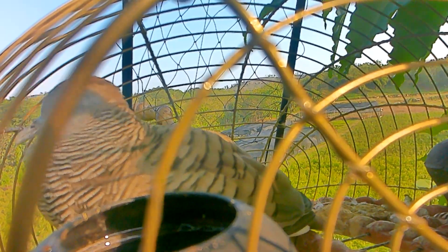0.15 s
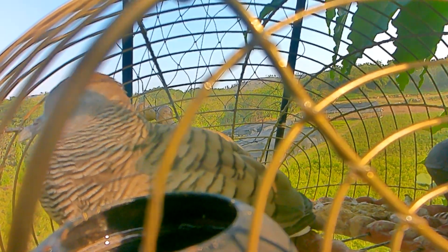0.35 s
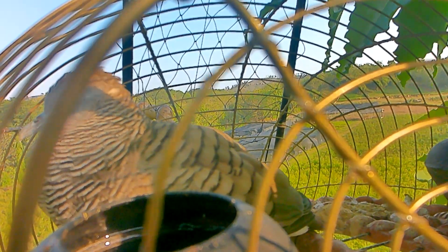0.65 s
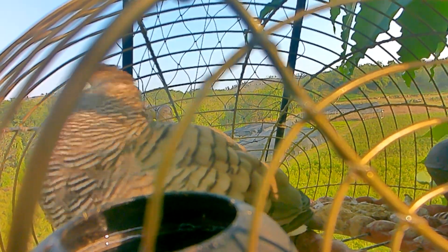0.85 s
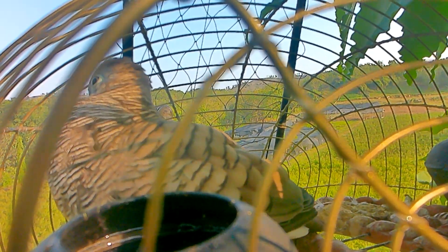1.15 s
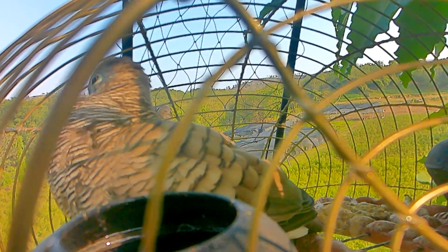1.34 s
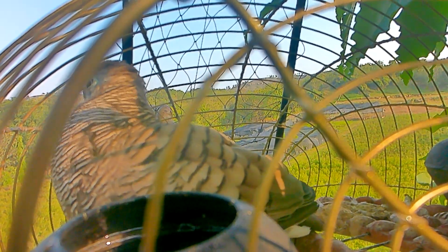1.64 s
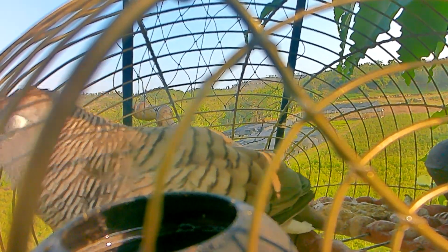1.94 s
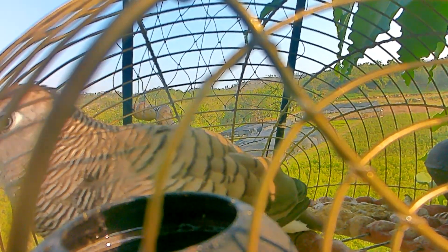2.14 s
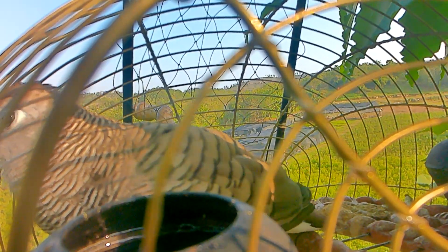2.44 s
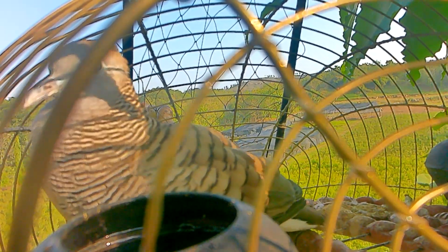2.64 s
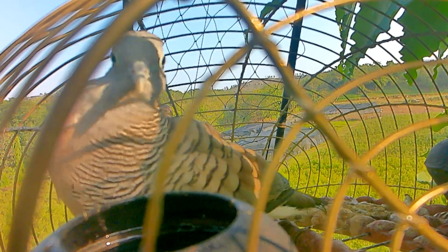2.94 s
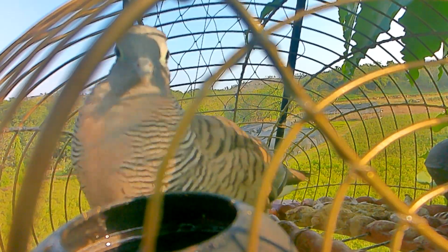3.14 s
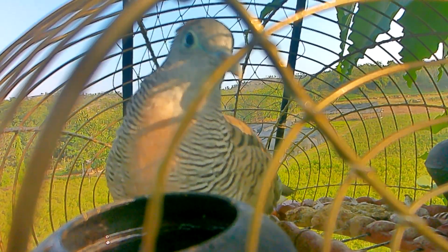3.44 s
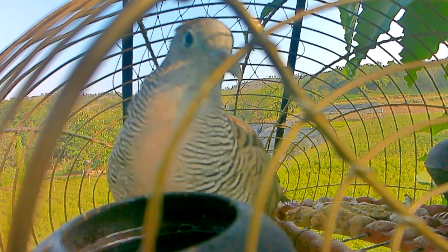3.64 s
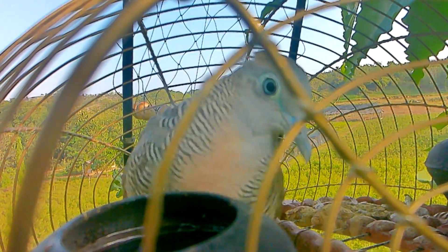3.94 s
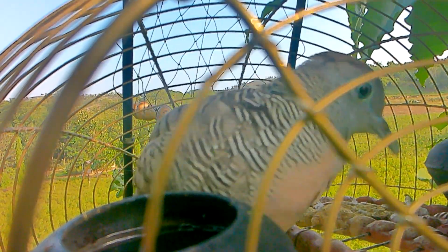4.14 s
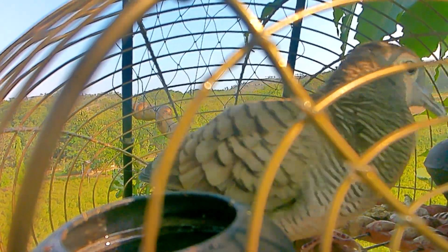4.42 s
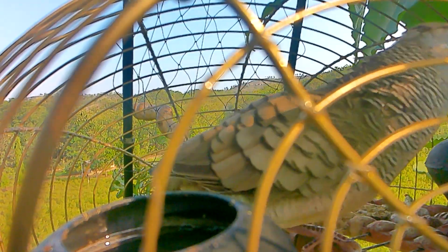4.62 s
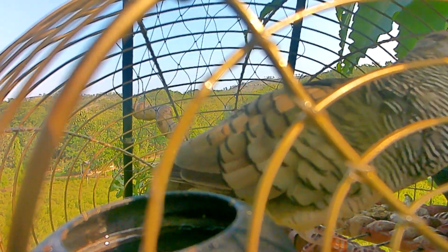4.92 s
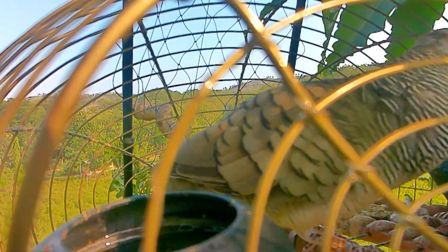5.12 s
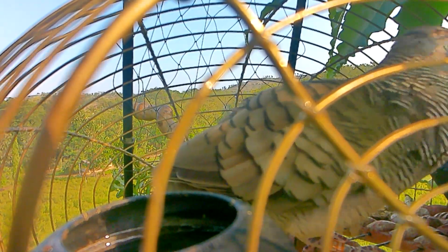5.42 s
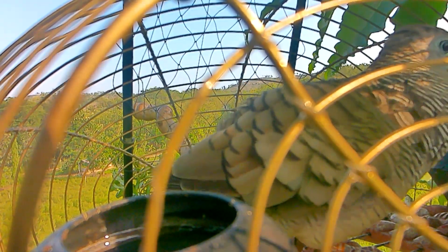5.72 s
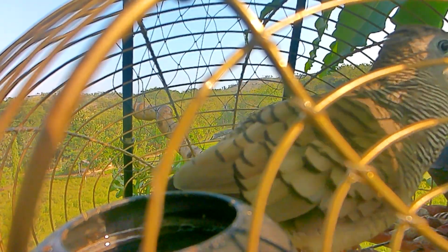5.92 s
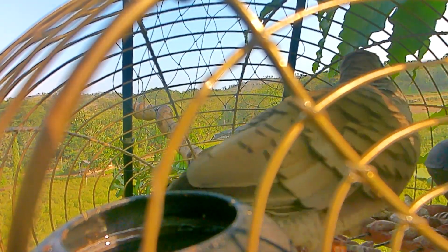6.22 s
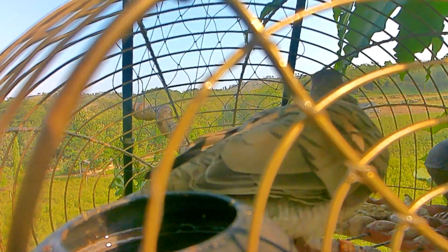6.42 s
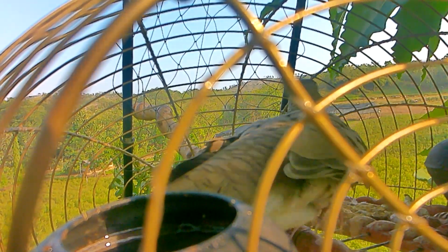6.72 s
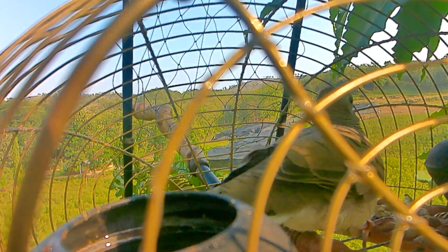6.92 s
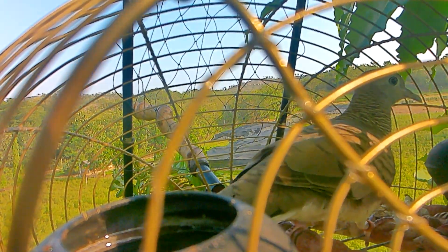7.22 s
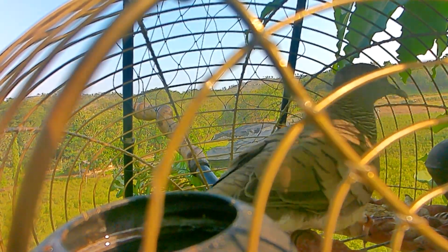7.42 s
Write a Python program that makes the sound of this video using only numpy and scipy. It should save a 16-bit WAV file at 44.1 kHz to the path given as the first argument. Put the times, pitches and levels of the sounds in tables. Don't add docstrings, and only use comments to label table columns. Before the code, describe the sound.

Outdoors in an open field, very close to a small microphone, wind rumbles and buffets softly over a faint distant engine hum. A caged dove gives a rolling four-note coo at two seconds, then shifts its feet with dry knocks on cane. A heavy wind thump hits, more claw rattles follow, then a softer coo near five seconds. A far bird repeats tiny falling whistles as the feet scrabble again.

```python
import sys
import numpy as np
from scipy import signal
from scipy.io import wavfile
from scipy.ndimage import uniform_filter1d

SR = 44100
rng = np.random.default_rng(int(sys.argv[2]) if len(sys.argv) > 2 else 0)


def persist_wave(psi):
    counts = np.round(np.clip(psi, -1, 1) * 32767).astype(np.int16)
    wavfile.write(sys.argv[1], SR, np.atleast_2d(counts).T)


def ratio_of_db(decibels):
    return 10 ** (np.asarray(decibels, float) / 20)


N = 333387


def evened(x):
    return x / np.sqrt(np.mean(x ** 2) + 1e-20)


def smoothed(x, size):
    return signal.oaconvolve(x, np.hanning(size) / np.hanning(size).sum(), "same")


def drifting(count, size):
    return evened(smoothed(rng.standard_normal(count), size=size))


def along(table, x):
    return np.interp(x, *np.transpose(table))


def add(mix, s, sound):
    part = mix[round(s * SR):][:len(sound)]
    part += sound[:len(part)]


def resonate(x, hz, width):
    pole = np.exp((2j * np.pi * hz - np.pi * width) / SR)
    return 2 * signal.lfilter([1 - abs(pole)], [1, -pole], x).real


def noise_band(hz, width):
    return evened(resonate(rng.standard_normal(N), hz, width))


def coloured(points, patchy_db, size):
    hop, hz = size // 4, np.fft.rfftfreq(size, 1 / SR)
    a, b, patches = rng.standard_normal((N // hop + 5, len(hz), 3)).T
    patches = uniform_filter1d(patches, size=10, axis=0)
    patches = evened(uniform_filter1d(patches, size=8, axis=1))
    f, db = np.transpose(points)
    shape_db = np.interp(np.log(hz + 1), np.log(f + 1), db, left=-120, right=-120)
    spectrum = (a + 1j * b) * ratio_of_db(shape_db[:, None] + patchy_db * patches)
    return evened(signal.istft(spectrum, nperseg=size, noverlap=size - hop)[1][:N])


def echoes(x, t60, first_s):
    t = np.arange(SR // 2) / SR
    present = rng.standard_normal(len(t)) * (rng.random(len(t)) < .05)
    taps = present * ratio_of_db(-60 * t / t60) * (t > first_s)
    return signal.fftconvolve(x, taps / np.linalg.norm(taps))[:N]


# (frequency [Hz], density [dB per Hz])
AIR_WASH = [(71, -26.5), (120, 0.5), (270, -12), (308, -7.5), (428, -7.5), (465, -4.5), (493, -11.5),
            (541, -14.5), (616, -15.5), (685, -20.5), (744, -26), (2000, -37.5), (2600, -72), (4400, -120)]
# (frequency [Hz], density [dB per Hz])
MIC_HISS = [(1180, -35.5), (2000, -2.5), (2820, -3), (3050, -3), (3940, -5), (4760, -5), (5190, -7.5),
            (14700, -9.5), (15600, -5.5)]
# (frequency [Hz], width [Hz], level [dB])
ENGINE_LINES = [(299, 5, -63.5), (330.8, 7.4, -66), (462, 3.1, -58), (713, 17, -74)]


def field():
    wash = ratio_of_db(-47.5) * coloured(AIR_WASH, patchy_db=1.5, size=1024)
    hiss = ratio_of_db(-69) * coloured(MIC_HISS, patchy_db=1.1, size=512)
    engine = sum(ratio_of_db(db) * noise_band(hz, width) for hz, width, db in ENGINE_LINES)
    return wash + hiss + engine


# (frequency [Hz], density [dB per Hz])
LOW_PRESSURE = [(5.9, -30), (10, 0.5), (17, 3.5), (20, 0.5), (22, -8), (76, -6), (108, -12), (130, -32),
                (170, -53), (290, -120)]
# (time of the peak [s], level [dB], half length [s])
GUSTS = [(.05, -29, 0.02), (0.178, -30.5, 0.12), (0.445, -34.5, 0.19), (0.933, -31, .04),
         (1.104, -34, 0.26), (1.36, -36, .04), (1.555, -44, 0.037), (1.85, -34.5, 0.053),
         (2.06, -36.5, 0.052), (2.19, -31.5, 0.055), (2.634, -30.5, 0.042), (3.352, -43, 0.037),
         (3.65, -31, 0.084), (3.868, -21.5, .05), (4.03, -30, 0.045), (4.315, -35.5, 0.13),
         (4.614, -30.5, 0.087), (4.905, -32, 0.071), (5.035, -37, 0.047), (5.666, -35, 0.059),
         (5.783, -36, 0.053), (6.099, -32.5, .07), (6.318, -31, .1), (6.75, -37, 0.14), (7.298, -34.5, .12),
         (7.5, -38, .06)]
# (time [s], frequency [Hz])
MOAN_DRIFT = [(0, 46.7), (.55, 65), (.84, 83.6), (1.3, 68), (2.06, 54.85), (2.25, 64.64), (2.74, 66.05),
              (2.9, 79), (3.4, 73.2), (3.66, 59.9), (4.2, 64), (4.9, 52.37), (5.2, 72.8), (5.5, 65.3),
              (5.8, 78.9), (6.4, 84.1), (7.0, 59.83), (7.56, 82.7)]
# (time [s], peak level [dB], frequency [Hz], length [cycles])
GUST_SLAPS = [
    (0.244, -19.5, 44.4, 1.4),
    (0.255, -21, 258, 1.6),
    (3.826, -18.5, 56.7, 0.85),
    (3.854, -12, 77.5, 0.99),
    (3.863, -12, 40.3, 1.05),
    (3.861, -26.5, 380, 2.7),
    (3.907, -19, 40, 1.7),
    (4.894, -16, 38, 1.3),
    (4.919, -23, 143, 1.67),
]


def wind():
    t = np.arange(N) / SR
    breeze_db = -42
    bright = coloured([(100, -20.5), (130, 5.5), (230, -9.5), (400, -30.0)], patchy_db=2.5, size=1024)
    turns = 2 * np.pi * np.cumsum(along(MOAN_DRIFT, t)) / SR
    moan = (0.9 + drifting(N, 4000)) * np.cos(turns) + drifting(N, 4000) * np.sin(turns)
    force = ratio_of_db(breeze_db + 0.5 * drifting(N, 5000))
    for s, db, half_s in GUSTS:
        span = slice(max(round((s - 3 * half_s) * SR), 0), round((s + 3 * half_s) * SR))
        force[span] = np.maximum(force[span], ratio_of_db(db - 9 * abs(t[span] - s) / half_s))
    low = ratio_of_db(-0.5) * coloured(LOW_PRESSURE, patchy_db=0.0, size=4096)
    out = force * (low + ratio_of_db(-4.0) * evened(moan))
    out += ratio_of_db(-53.5) * (force / ratio_of_db(breeze_db)) ** 0.65 * bright
    for s, db, hz, cycles in GUST_SLAPS:
        u = np.arange(round(cycles / hz * SR)) * hz / SR
        add(out, s, ratio_of_db(db) * np.sin(2 * np.pi * u) * np.sin(np.pi * u / cycles) ** 2)
    return out


# (time [s], peak level [dB], 1.2 kHz share [dB], 2.4 kHz share [dB])
KNOCKS = [(0.088, -41.5, -22, -41), (3.086, -32.5, -10, -19), (3.093, -26.5, -27, -32),
          (3.1, -30.5, -14.5, -26), (3.125, -32.5, -18, -36), (3.139, -31, -12.5, -41),
          (3.159, -45, -13.5, -41), (3.63, -39.5, -14, -42), (3.691, -45, -20, -32), (4.026, -41, -25, -44),
          (4.101, -38.5, -24, -36), (4.205, -54, -20, -14), (4.251, -44, -5, -22), (4.266, -34, -28, -43),
          (4.364, -42, -8.5, -28), (4.377, -42.5, -7.5, -37), (4.428, -28.5, -16, -39),
          (4.457, -42, -20, -33), (6.19, -40.5, -20, -25), (6.425, -31, -12, -34), (6.462, -38, -19, -41),
          (6.765, -48.5, -11, -14), (6.808, -46, -3.5, -35), (6.913, -51, -22, -14), (6.953, -29, -31, -34),
          (6.967, -37.5, -20, -23), (6.985, -34, -36, -30), (7.051, -44, -11, -24), (7.084, -46, -24, -17),
          (7.528, -40, -3.5, -5)]
# (start [s], length [s], level [dB])
SHUFFLES = [(0, 0.242, -64), (0.998, 0.47, -73), (3.056, 0.15, -62), (3.254, 0.49, -69.5),
            (3.81, 0.11, -64), (4.013, 0.51, -67), (4.62, .14, -66), (6.166, 0.32, -66.5),
            (6.535, 0.33, -71), (6.8, 0.31, -64.5), (7.384, 0.28, -65.5)]
# (frequency [Hz], width [Hz], level [dB])
LOW_MODES = [(500.3, 65, 0.5), (567.4, 18.5, -2.5), (656, 28, -12.5), (811, 58, -17.5)]
MID_MODES = [(888, 8, -4), (1160, 51, -3.5), (1239.5, 28, -2.5), (1398, 77, -14)]
HIGH_MODES = [(2250, 94, -2.5), (2567, 164, -7), (4200, 160, -21), (5300, 200, -20), (11000, 400, -30)]


def cage():
    drives, t = np.zeros((3, N)), np.arange(1500) / SR
    blow = np.exp(-((t - .0004) / .00015) ** 2)
    for s, db, mid_db, high_db in KNOCKS:
        grit = rng.standard_normal(len(t))
        scrape = ratio_of_db(27 - 60 * t / 0.057) * np.minimum(t / 0.0013, 1) * grit
        add(drives[0], s, ratio_of_db(db) * (ratio_of_db(24) * blow + ratio_of_db(-4) * scrape))
        add(drives[1], s, ratio_of_db(db + mid_db) * (ratio_of_db(26.5) * blow + scrape))
        add(drives[2], s, ratio_of_db(db + high_db) * (ratio_of_db(36) * blow + scrape))
    busy = np.zeros(N)
    for s, length, db in SHUFFLES:
        u = np.arange(0, length, 1 / SR)
        add(busy, s, ratio_of_db(db) * np.minimum(np.minimum(u, length - u) / 0.013, 1))
    grain_db = 1.5 * drifting(N, 900)
    rustle = rng.standard_normal(N) * busy * ratio_of_db(grain_db + 24.5)
    drives += rustle * ratio_of_db(np.array([[6.], [0.], [-11.]]))
    out = np.zeros(N)
    for drive, modes in zip(drives, (LOW_MODES, MID_MODES, HIGH_MODES)):
        for hz, width, db in modes:
            pole_width = 1.41 * width
            out += ratio_of_db(db) * resonate(resonate(drive, hz, pole_width), hz, pole_width)
    return out


# (multiple, level [dB])
HARMONICS = [(1, 0), (2, -37), (3, -49), (4, -54), (5, -57), (6, -63), (7, -55)]


def voiced(turns, second_db, upper_db):
    flicker_db = 3.0 * drifting(len(turns), 500)
    lift_db = {1: 0, 2: second_db + flicker_db}
    tone = 0
    for k, db in HARMONICS:
        tone = tone + ratio_of_db(db + lift_db.get(k, upper_db + flicker_db)) * np.sin(2 * np.pi * k * turns)
    return np.sqrt(2) * tone


# (time [s], level [dB])
BEAK_OPENING = [(2.05, -2.5), (2.2, -5.5), (2.33, 1.5), (2.46, 0), (4.86, -3.5), (4.95, -2), (4.99, 10),
                (5.04, -1), (5.13, 13), (5.25, 1.5)]


def opening(s, creak_s, pop_s, creak_db, pop_db):
    t = np.arange(0, creak_s + pop_s + 0.017, 1 / SR)
    knots = [0, creak_s, creak_s + .35 * pop_s, creak_s + pop_s]
    pop_end_hz = 986 + 2200 * pop_s
    turns = np.cumsum(np.interp(t, knots, [420, 440 - 2500 * pop_s, 465, pop_end_hz / 2])) / SR
    beat_hz = np.interp(t / creak_s, [0, 1, 1.6], [470 - 8500 * creak_s, 460, 560])
    beat = 2 * np.pi * np.cumsum(beat_hz) / SR
    pulses = np.sin(beat) + .6 * np.sin(2 * beat + 1.2) + .25 * np.sin(3 * beat + 2.4)
    rasp = np.diff(rng.standard_normal(len(t) + 1))
    pulses += .4 * evened(smoothed(smoothed(rasp, size=40), size=40))
    creak = ratio_of_db(creak_db + np.interp(t / creak_s, [0, .8, 1.15, 1.7], [-12, 0, -2, -24]))
    creak = smoothed(creak * np.minimum(t / .002, 1), size=120)
    throat = signal.butter(4, 1300, fs=SR, output="sos")
    creak = signal.sosfilt(throat, creak * pulses)
    u = (t - creak_s) / pop_s
    swell = smoothed(np.interp(u, [-.15, .2, .4, .72, .94, 1.04], [0, .4, .72, 1, .83, 0]), size=90)
    strain_db = along(BEAK_OPENING, s) + 22 * (np.clip(u, 0, 1) - .7)
    return np.sqrt(2) * creak + ratio_of_db(pop_db) * swell * voiced(2 * turns, strain_db, upper_db=-8.5)


# (time [s], creak length [s], pop length [s], creak level [dB], pop level [dB])
NOTE_OPENINGS = [
    (1.998, 0.022, 0.022, -29.5, -17),
    (2.219, 0.0062, 0.016, -34, -16.5),
    (2.303, 0.0085, 0.013, -28.5, -16),
    (2.404, 0.0075, 0.016, -27, -17.5),
    (4.809, 0.00946, 0.030, -32.5, -28.5),
    (5.018, 0.0041, 0.0172, -37, -27),
    (5.095, 0.0072, 0.018, -35.5, -26.5),
    (5.197, 0.0087, 0.016, -34, -25.5),
]
# (time [s], length [s], level [dB], top [Hz], sag after the top [Hz])
THROBS = [(2.04, 0.027, -24.5, 1274, 33), (2.067, 0.031, -24.5, 1287, 7.7), (2.100, .037, -23, 1259, 60),
          (2.136, 0.032, -23, 1231, 52), (2.172, 0.034, -23, 1193, 37), (2.24, 0.017, -24, 1160, 77),
          (2.325, .028, -25, 1172, 54), (2.429, 0.098, -23.5, 1236, 160), (4.850, 0.024, -25, 1255, 5),
          (4.874, 0.027, -24.5, 1255, 81), (4.899, 0.036, -24.5, 1233, 46), (4.937, 0.028, -25, 1216, 31.5),
          (4.975, 0.034, -31, 1184, 92), (5.038, 0.015, -36.5, 1126, 110), (5.124, 0.0144, -34, 1145, 126),
          (5.225, 0.076, -27.5, 1228, 110), (5.290, 0.022, -41, 1140, 42), (0, 0.012, -33, 1190, 150)]
# (time [s], peak level [dB])
TONGUE_CLICKS = [
    (0.045, -45.5),
    (1.969, -36),
    (4.774, -45.5),
]
# (frequency [Hz], width [Hz], level [dB])
BREATH_BANDS = [(645, 420, -28.5), (1530, 350, -35), (1940, 280, -39.5)]


def dove():
    hz, gain = np.full(N, 1100.), np.zeros(N)
    release = ratio_of_db(-60 * np.arange(1500) / SR / 0.014)
    pop_ends = np.array([0] + [row[0] + row[1] + row[2] for row in NOTE_OPENINGS])
    for s, length, db, top_hz, sag_hz in sorted(THROBS):
        late_s = s - pop_ends[pop_ends < s + .02].max()
        at, u = round(s * SR), np.linspace(0, 1, round(length * SR))
        dip_hz = 50.1 + 45000 * abs(late_s) ** 3
        rise, sag = np.sqrt(dip_hz), np.sqrt(abs(sag_hz))
        slope = u * (rise + sag) - rise
        below = slope ** 2
        fade_db = 0.065 * below * (slope > 0) + 1.5 * u + 3 * (1 - u) ** 4
        hz[at:] = top_hz - sag_hz
        hz[at:at + len(u)] = top_hz - below
        gain[at + len(u):][:len(release)] = ratio_of_db(db - fade_db[-1]) * release
        gain[at:at + len(u)] = ratio_of_db(db - fade_db)
    shimmer = 1 + .035 * drifting(N, 300)
    gain = smoothed(gain, size=170) * shimmer
    air = 0
    for f, width, db in BREATH_BANDS:
        air = air + ratio_of_db(db) * evened(resonate(resonate(rng.standard_normal(N), f, width), f, width))
    t = np.arange(N) / SR
    turns = np.cumsum(uniform_filter1d(hz, size=150)) / SR
    upper_db = -0.5 - 3.5 * (t > 4)
    out = gain * (air + voiced(turns, along(BEAK_OPENING, t), upper_db))
    for row in NOTE_OPENINGS:
        add(out, row[0], opening(*row))
    t = np.arange(600) / SR
    for s, db in TONGUE_CLICKS:
        click = ratio_of_db(db + 11 - 60 * t / 0.014) * (1 - np.exp(-(t / 0.0009) ** 2))
        add(out, s, click * np.sin(2 * np.pi * 960 * t))
    return out + ratio_of_db(-19.5) * echoes(out, t60=0.11, first_s=0.0056)


# (time [s], length [s], frequency [Hz], level [dB])
PEEPS = [(4.645, .03, 2850, -66), (4.70, .008, 5100, -66), (4.71, .007, 5250, -67),
         (4.705, .006, 5700, -69), (4.235, .022, 2550, -61), (.17, .03, 2750, -67), (.23, .02, 2700, -67),
         (6.19, .06, 590, -43), (.005, .03, 1290, -52), (4.52, .06, 390, -47), (3.32, .13, 1260, -66),
         (.06, .06, 1260, -63), (.125, .05, 1270, -64), (.19, .06, 1250, -67), (1.03, .12, 1285, -66),
         (1.13, .13, 1280, -68)]


def peeps():
    out = np.zeros(N)
    for start, length, hz, db in PEEPS:
        t = np.arange(0, length, 1 / SR)
        add(out, start, ratio_of_db(db) * np.hanning(len(t)) * np.sin(2 * np.pi * hz * t))
    return out


# (time from its start [s], frequency [Hz], level [dB])
WHISTLE_GLIDE = [(0, 6440, -13), (0.01, 5300, -3), (.03, 4490, -2.5), (.055, 3484, 3.5), (.085, 2962, 1),
                 (0.116, 2720, 3.5), (.135, 2600, -26)]
# (time [s], level [dB], fade by the end [dB])
WHISTLES = [
    (4.93, -63, -7),
    (5.59, -62.5, -4),
    (6.393, -61.5, -3.5),
    (7.102, -61, -3),
]


def far_bird():
    out, (s, hz, db) = np.zeros(N), np.transpose(WHISTLE_GLIDE)
    t = np.arange(0, s[-1], 1 / SR)
    turns = np.cumsum(np.interp(t, s, hz)) / SR
    whistle = ratio_of_db(np.interp(t, s, db)) * np.sqrt(2) * np.sin(2 * np.pi * turns)
    for start, level_db, fade_db in WHISTLES:
        flutter_db = 3.2 * drifting(len(t), 300)
        add(out, start, ratio_of_db(level_db + flutter_db + fade_db * (t / t[-1]) ** 2) * whistle)
    return ratio_of_db(-5) * out + ratio_of_db(-3.5) * echoes(out, t60=.24, first_s=.004)


def scene():
    return (field() + wind() + cage() + dove() + peeps() + far_bird())[None]


def roll_off(x):
    return signal.sosfilt(signal.butter(12, 16610, fs=SR, output="sos"), x)


def record(dry):
    low_pass = signal.firwin(1023, 15730, window=("kaiser", 9), fs=SR)[None]
    mix = signal.oaconvolve(dry, low_pass, "same") + .0266
    return roll_off(mix)


dry = scene()
out = record(dry)
persist_wave(out)
```